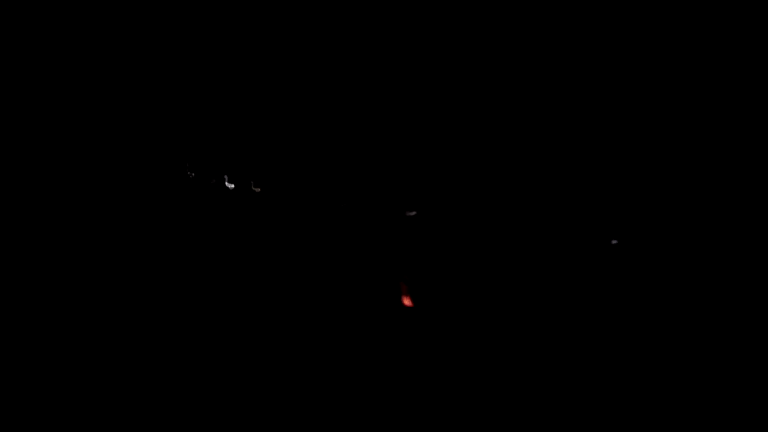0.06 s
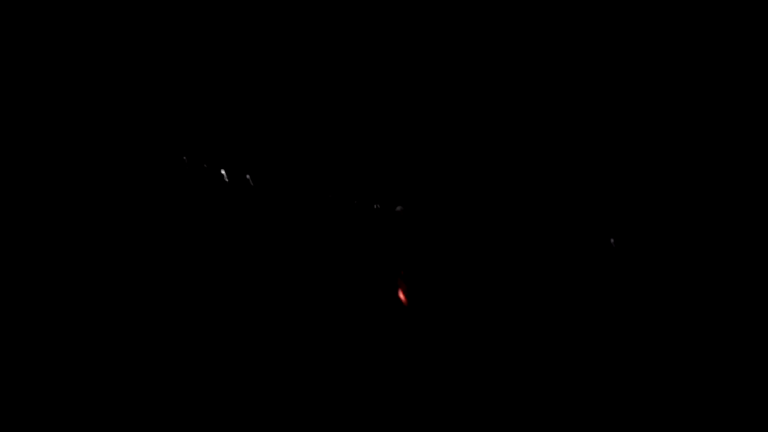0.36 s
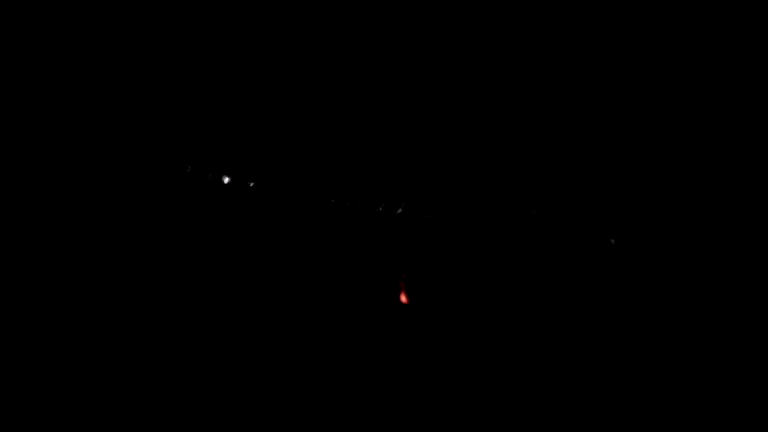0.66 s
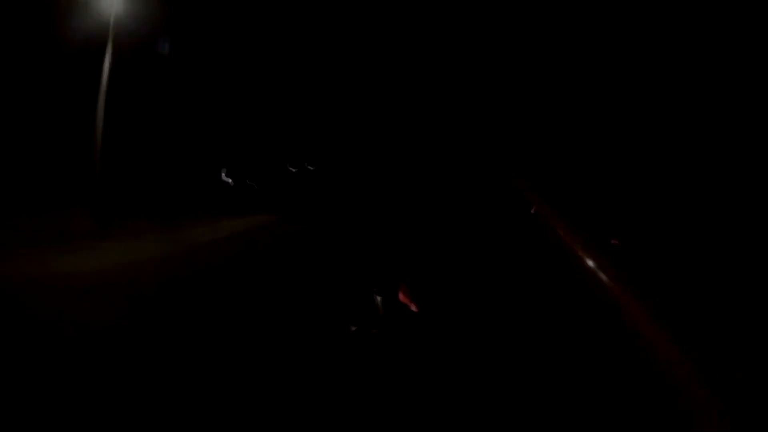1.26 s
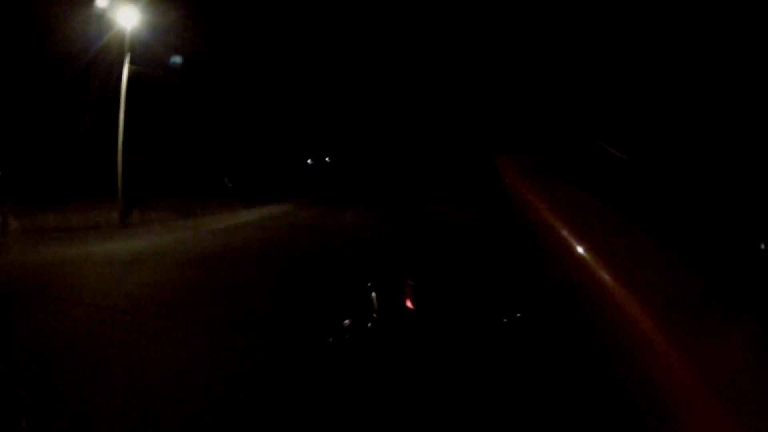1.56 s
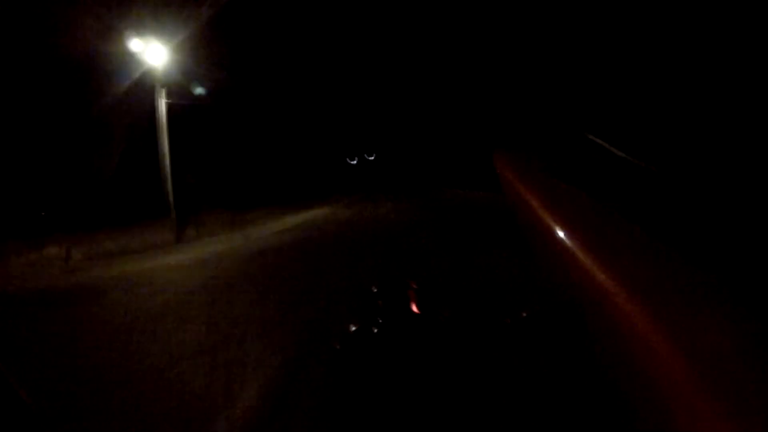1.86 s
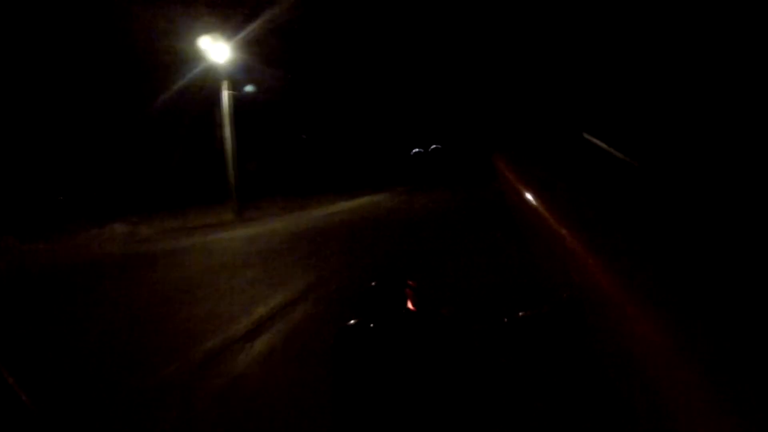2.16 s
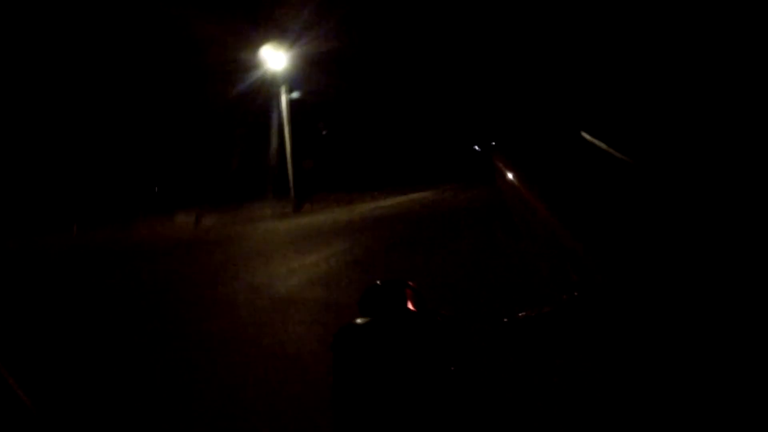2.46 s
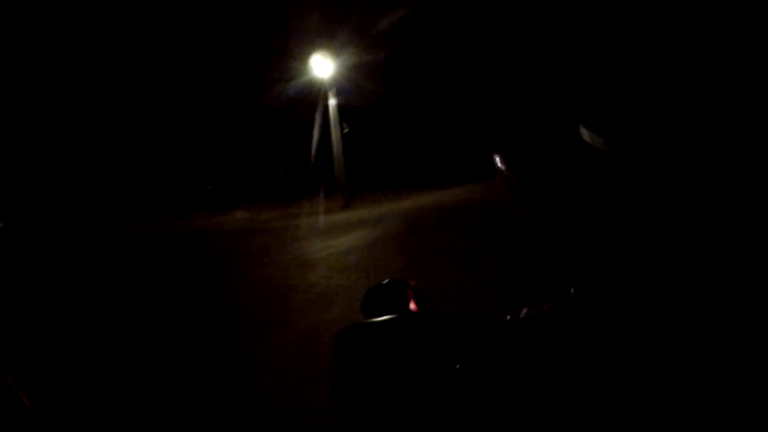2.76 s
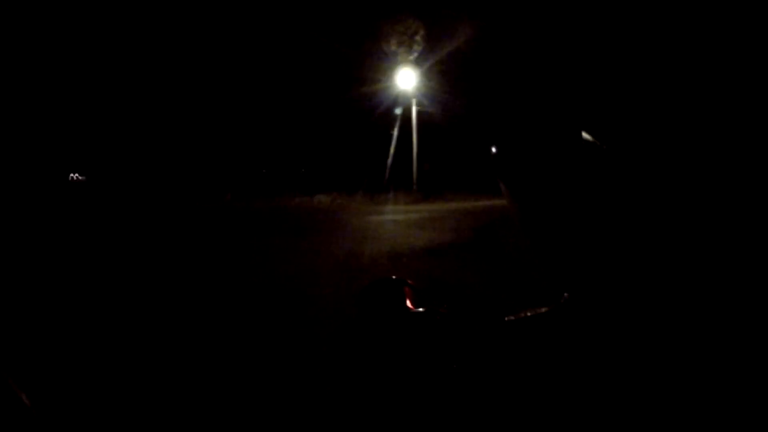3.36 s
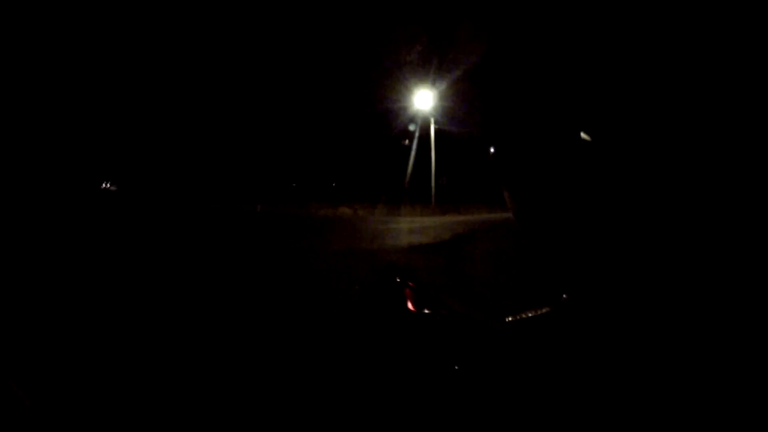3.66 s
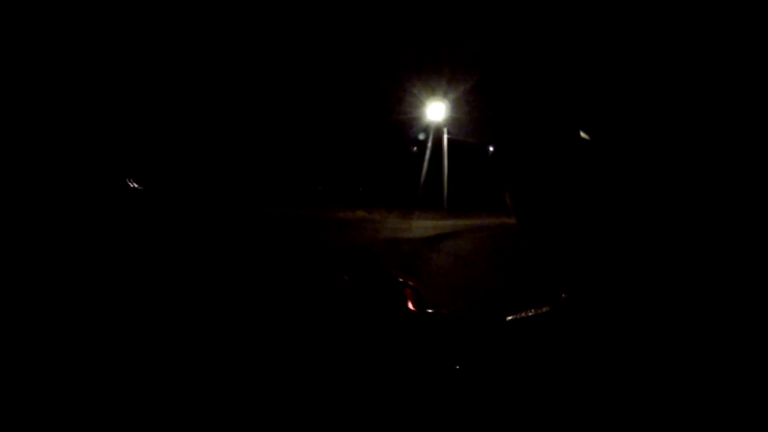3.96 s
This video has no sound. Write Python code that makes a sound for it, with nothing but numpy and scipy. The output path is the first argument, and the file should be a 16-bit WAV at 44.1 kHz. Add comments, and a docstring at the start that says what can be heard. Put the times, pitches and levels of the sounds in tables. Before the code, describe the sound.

Strong wind batters the microphone on a moving motorcycle, crackling and hooting. It drops away to bare the thudding engine, which gathers speed until a duller wind returns. Heard from the saddle, almost entirely on the left.

```python
"""Night ride on a motorcycle

Heard from the saddle, on a camera microphone that works on the left only. A strong gust batters the
microphone and hoots across an edge; it drops away and bares the thudding engine, which gathers speed
until a duller wind returns. A limiter ducks after the hardest buffets."""
import sys
import numpy as np
from scipy import signal
from scipy.fft import rfft, irfft
from scipy.io import wavfile
from scipy.ndimage import uniform_filter1d

SR = 44100
rng = np.random.default_rng(int(sys.argv[2]) if len(sys.argv) > 2 else 0)


def unload_wav(signal):
    """Save mono or channel-first audio to the path in sys.argv[1] as 16-bit WAV at rate SR, clipped to [-1, 1]."""
    wavfile.write(
        sys.argv[1],
        SR,
        np.round(np.clip(np.atleast_2d(signal).T, -1, 1) * 32767).astype(np.int16),
    )


N = 176400
T = np.arange(N) / SR

# head wind on the microphone: t/s, level/dB
GUST_LEVEL = [(0.0, -23.5), (0.334, -23), (0.354, -28), (0.4, -26.5), (0.416, -28.5), (0.54, -18.5),
              (0.546, -20), (0.638, -22.5), (0.644, -28), (0.73, -21.5), (1.144, -24), (1.276, -22),
              (1.302, -28.5), (1.462, -25), (1.468, -26), (1.524, -26.5), (1.792, -34.5), (1.85, -55)]
# its spectrum: f/Hz, level/dB
GUST_SPECTRUM = [(15, -23), (35, 0.5), (70, 2), (140, 0.5), (300, -1), (550, -4.5), (1000, -9),
                 (2000, -17.5), (3000, -29.5), (5000, -41), (8000, -47), (15000, -55.5)]
GUST_DB, GUST_STOP_S = 5.5, 0.021
# sharp crackles of wind: t/s, level/dB
CRACKLE_HITS = [(0.12, -20), (.189, -12), (.213, -21), (0.338, -20), (0.444, -25), (0.637, -18),
                (.752, -19), (0.827, -16), (0.87, -14.5), (.999, -23), (1.062, -14), (1.181, -17),
                (1.552, -21)]
# their spectrum: f/Hz, level/dB
CRACKLE_SPECTRUM = [(100, -24), (800, 13.5), (2000, 9.5), (3200, -1.5), (5000, -20), (15000, -33)]
# wind hooting across an edge: t/s, f/Hz, level/dB
EDGE_TONE = [(0, 447.7, -30.5), (.3, 452.2, -21.5), (.4, 452.7, -30), (.53, 453.3, -17), (.65, 453.2, -26),
             (.76, 457, -20), (1.05, 457.3, -24), (1.35, 457.4, -25.5), (1.62, 461, -29), (1.85, 462, -46)]
# its partials: multiple of the pitch, level/dB
EDGE_PARTIALS = [(.5, 0), (1, 4.5), (2, -12.5)]
# duller wind as the speed builds: t/s, level/dB
BREEZE_LEVEL = [(2.7, -41), (3.0, -31), (3.14, -27.5), (3.19, -21.5), (3.3, -23.5), (3.39, -25), (3.5, -21),
                (3.62, -20), (3.7, -20.5), (3.83, -20.5), (4, -20.5)]
# its spectrum: f/Hz, level/dB
BREEZE_SPECTRUM = [(15, -8), (35, -0.5), (80, 1), (200, 0), (400, -3), (700, -14), (1100, -22.5),
                   (2000, -39), (4000, -37.5), (15000, -62.5)]
# hard buffets on the diaphragm: t/s, level/dB, width/s
BUFFET_HITS = [(0.539, -1, 0.0003), (.585, -2.5, .0014), (3.728, -8, 0.0015), (3.887, 6, 0.00084)]
# eddies hitting the microphone port: t/s, half length/s, level/dB
PORT_EDDIES = [(0.527, 0.0084, -14), (3.056, 0.003, -22), (3.217, 0.042, -29), (3.39, 0.0042, -34),
               (3.804, 0.047, -26.5)]
# snaps of fluttering air: t/s, level/dB
SNAP_HITS = [(.342, -33), (1.0, -35), (1.065, -34), (3.885, -29)]

# engine speed: t/s, firing rate/Hz
FIRING_RATE = [(0, 41), (1.5, 43), (1.87, 46.9), (2.27, 51.4), (2.55, 52.7), (3.1, 59.4), (3.5, 65.3),
               (4, 70)]
# exhaust at the saddle: t/s, level/dB
EXHAUST_LEVEL = [(0, -25), (1.3, -34.5), (1.8, -28.5), (2.1, -26), (2.7, -24.5), (3.3, -21), (4, -22)]
# exhaust pipe modes: f/Hz, t60/s, level/dB
PIPE_MODES = [(104.3, 0.1, -21), (241.6, 0.1, -13.5)]
PUFF_S, PUFF_DB_PER_OCTAVE, PIPE_DELAY_S, PIPE_LOPE = 0.0005, -4, 0.00359, .33
ECHO_S, ECHO_DB, MUFFLER_HZ = 0.0028, -14, 426
INTAKE_HZ, INTAKE_T60_S, INTAKE_DB = 150, .045, -11
# clatter of valves and chain: f/Hz, level/dB
CLATTER_SPECTRUM = [(100, 6.5), (500, -1.5), (750, 1), (1750, -1.5), (2600, -6.5), (3500, -10),
                    (4350, -13.5), (5600, -20), (8000, -26), (15000, -32.5)]
CLATTER_DB, CLATTER_DB_PER_OCTAVE = -40, 3.5
# gear rasp: f/Hz, level/dB
GEAR_SPECTRUM = [(900, -30), (1650, -1), (2000, -0.5), (2300, -2), (2600, -5), (3400, -16.5), (4550, -10),
                 (5300, -20), (6500, -20.5), (15000, -55)]
GEARS_DB, GEARS_DB_PER_OCTAVE = -52, 26.5
# squeals of the drive: t/s, half length/s, f/Hz, level/dB
DRIVE_SQUEALS = [(2.33, .25, 4200, -60), (3.98, .035, 2020, -41)]

# resonances of the camera housing: f/Hz, width/Hz, level/dB
HOUSING_MODES = [(1428, 26, -10.5), (1852, 25, -3.5), (2310, 21, -14), (4220, 47, -2), (4610, 160, -2.5),
                 (5280, 290, -1)]
# wind leaking into the dead right side: f/Hz, level/dB
LEAK_SPECTRUM = [(30, -59), (500, -48.5), (1200, -43), (2500, -26.5), (5000, -4.5), (9000, -1), (15000, -2)]
# hiss on that side: f/Hz, level/dB
HISS_SPECTRUM = [(30, 4), (300, 9.5), (1000, 1.5), (15000, 0)]


def gust():
    """Head wind straight on the microphone, with sharp crackles."""
    crackles = colour(bursts(CRACKLE_HITS, decay_s=0.0041), CRACKLE_SPECTRUM)
    return amp(GUST_DB + curve(GUST_LEVEL)) * gust_end() * turbulence(GUST_SPECTRUM) + crackles


def gust_end():
    """Gain that shuts off the head wind quickly once it has dropped."""
    return np.exp(-np.maximum(T - GUST_LEVEL[-1][0], 0) / GUST_STOP_S)


def turbulence(spectrum, eddy_hz=30, flutter_hz=250):
    """Air tearing at the microphone: eddies swell it, and all above the bass flutters."""
    air = rng.standard_normal(N)
    body = signal.sosfiltfilt(butter(2, 1200), air)
    bass = signal.sosfiltfilt(butter(2, 220), air)
    eddies, flutter = wander(eddy_hz), amp(2.5 * wander(flutter_hz))
    rumble = bass * evened(amp(1.5 * wander(eddy_hz)))
    roar = (body - bass) * evened(flutter * amp(2 * eddies))
    rasp = (air - body) * evened(flutter * amp(1.26 * eddies))
    return evened(colour(rumble + roar + rasp, spectrum))


def hoot():
    """The head wind blows across an edge and sounds a wavering tone."""
    pitch = curve(EDGE_TONE) * (1 + 0.011 * wander(52))
    phase = 2 * np.pi * np.cumsum(pitch) / SR
    tone = sum(amp(db - 2 * wander(30)) * np.sin(multiple * phase) for multiple, db in EDGE_PARTIALS)
    return amp(curve(EDGE_TONE, column=2)) * gust_end() * evened(tone)


def breeze():
    """Duller wind on the microphone as the motorcycle speeds up."""
    return amp(curve(BREEZE_LEVEL)) * turbulence(BREEZE_SPECTRUM)


def buffets():
    """Single slaps of air on the diaphragm: a suck and its rebound."""
    out = np.zeros(N)
    for s, db, width in BUFFET_HITS:
        rebound = 0.29 * swell(s + 2.5 * width, 3.8 * width)
        out += amp(db) * (rebound - swell(s, width))
    return out


def whooshes():
    """Eddies hit the microphone port squarely and sound its hollow resonance."""
    hollow = evened(signal.sosfilt(butter(2, [328, 610], "band"), rng.standard_normal(N)))
    return sum(amp(db) * swell(s, width) for s, width, db in PORT_EDDIES) * hollow


def snaps():
    """Fluttering air makes very short, bright ticks."""
    return signal.sosfilt(butter(2, 4500, "high"), bursts(SNAP_HITS, decay_s=.0028))


def engine():
    """Just below the saddle: the exhaust thuds; clatter and gears pulse with it and grow with speed."""
    rate = curve(FIRING_RATE)
    octaves = np.log2(rate / rate.mean())
    turns = .03 + np.cumsum(rate * (1 + .003 * wander(30))) / SR  # one firing a turn, slightly uneven
    thuds = amp(curve(EXHAUST_LEVEL)) * exhaust(turns, octaves)
    clatter = amp(CLATTER_DB + CLATTER_DB_PER_OCTAVE * octaves) * noise(CLATTER_SPECTRUM)
    gears = amp(GEARS_DB + GEARS_DB_PER_OCTAVE * octaves) * gear_train(turns)
    pulsing = 1 + 0.13 * np.cos(2 * np.pi * turns)
    flicker = amp(1.1 * wander(150))
    return thuds + pulsing * flicker * (clatter + gears)


def exhaust(turns, octaves):
    """Each firing puffs and rings the pipe; the intake gulps on every second one. All is muffled."""
    count = np.floor(turns)
    fires = np.diff(count, prepend=count[0])
    t = T[:SR // 4]
    onset = 1 - np.exp(-t / PUFF_S)
    puff = (t / PUFF_S) ** 4 * np.exp(-t / PUFF_S)
    strength = amp(PUFF_DB_PER_OCTAVE * octaves + .4 * rng.standard_normal(N))
    puffs = -signal.oaconvolve(fires * strength, puff / puff.max())[:N]
    echo = amp(ECHO_DB) * np.interp(T - ECHO_S, T, puffs)  # from the end of the pipe
    ring = onset * sum(amp(db - 60 * t / t60) * np.sin(2 * np.pi * hz * t) for hz, t60, db in PIPE_MODES)
    lope = 1 - PIPE_LOPE * np.cos(np.pi * turns)  # strong and weak in turn
    kicks = fires * (lope + .1 * rng.standard_normal(N))
    pipe = signal.oaconvolve(np.interp(T - PIPE_DELAY_S, T, kicks), ring)[:N]
    gulp = onset * amp(INTAKE_DB - 60 * t / INTAKE_T60_S) * np.sin(2 * np.pi * INTAKE_HZ * t)
    intake = signal.oaconvolve(fires * (count % 2), gulp)[:N]
    pressure = evened(signal.sosfilt(butter(1, 2.9, "high"), puffs + echo + pipe + intake))
    return signal.sosfiltfilt(butter(4, MUFFLER_HZ), pressure)


def gear_train(turns, slack_turns=.002):
    """Teeth meet in the same uneven pattern on every turn, blurred by their slack."""
    teeth = rng.standard_normal(400)
    places = np.arange(len(teeth)) / len(teeth)
    pattern = np.interp(turns + slack_turns * wander(260), places, teeth, period=1)
    return evened(colour(pattern, GEAR_SPECTRUM))


def squeals(width_hz=52):
    """Thin, fuzzy metallic squeals from the drive swell and fade."""
    out = np.zeros(N)
    for s, half_length, hz, db in DRIVE_SQUEALS:
        phase = 2 * np.pi * hz * T
        fuzzy_tone = wander(width_hz) * np.cos(phase) + wander(width_hz) * np.sin(phase)
        out += amp(db) * swell(s, half_length) * fuzzy_tone
    return out


def housing(x):
    """The camera's shell rings a little around the microphone."""
    return x + sum(amp(db) * signal.lfilter(*signal.iirpeak(hz, hz / width, fs=SR), x)
                   for hz, width, db in HOUSING_MODES)


def dead_side(motor):
    """The right channel carries only hiss and a faint leak of head wind and engine."""
    thin_wind = colour(turbulence(GUST_SPECTRUM), LEAK_SPECTRUM)
    wind_leak = amp(1 + GUST_DB + curve(GUST_LEVEL)) * gust_end() * thin_wind
    return wind_leak + amp(-56) * motor + amp(-65) * noise(HISS_SPECTRUM)


def amp(db):
    """Decibels to gain."""
    return 10 ** (np.asarray(db) / 20)


def evened(x):
    """Scales to an rms of one."""
    return x / np.sqrt(np.mean(x ** 2) + 1e-20)


def curve(rows, column=1):
    """One column of a table over time."""
    rows = np.array(rows)
    return np.interp(T, rows[:, 0], rows[:, column])


def butter(order, hz, kind="low"):
    """Sections of a filter with a flat passband."""
    return signal.butter(order, hz, kind, fs=SR, output="sos")


def colour(x, spectrum, size=8192):
    """Minimum-phase filter shaped by rows of f/Hz, level/dB."""
    hz, db = np.transpose(spectrum)
    bins_hz = abs(np.fft.fftfreq(size, 1 / SR))
    log_gain = np.log(amp(np.interp(np.log(bins_hz + 1), np.log(hz), db)))
    taps = np.fft.ifft(np.exp(np.conj(signal.hilbert(log_gain)))).real[:size // 2]
    return signal.oaconvolve(x, taps)[:N]


def noise(spectrum):
    """Coloured noise of unit rms."""
    return evened(colour(rng.standard_normal(N), spectrum))


def wander(hz):
    """Smooth random motion of unit rms, up to about the given rate."""
    f = np.fft.rfftfreq(N, 1 / SR)
    band = np.exp(-(f / hz) ** 2) * np.minimum(f / hz * 10, 1)
    return evened(irfft(rfft(rng.standard_normal(N)) * band, N))


def swell(s, width):
    """A bell-shaped rise and fall around a moment."""
    return np.exp(-((T - s) / width) ** 2)


def bursts(hits, decay_s):
    """Bursts of noise that start at once and die quickly."""
    envelope = sum(amp(db) * (T >= s) * np.exp(-abs(T - s) / decay_s) for s, db in hits)
    return envelope * rng.standard_normal(N)


def scene():
    """From the saddle: wind and engine reach the left side through the housing; the right is near dead."""
    motor = engine() + squeals()
    wind = gust() + hoot() + breeze() + whooshes() + buffets() + snaps()
    return np.array([housing(wind + motor), dead_side(motor)])


def record(dry, limit_db=-4.5, recover_db_per_s=85, top_hz=14950):
    """The camera's limiter catches peaks on each side and lets go slowly; soft ends, band limit."""
    over_db = np.maximum(20 * np.log10(abs(dry) + 1e-9) - limit_db, 0)
    recovery_db = T * recover_db_per_s
    held_db = np.maximum.accumulate(over_db + recovery_db, axis=1) - recovery_db
    limited = dry / amp(uniform_filter1d(held_db, size=24, axis=1))
    faded = limited * np.clip(np.minimum(T, T[-1] - T) / .003, 0, 1)
    lowpass = signal.firwin(511, top_hz, window=("kaiser", 9), fs=SR)
    return signal.oaconvolve(faded, lowpass[None], "same")


dry = scene()
out = record(dry)
unload_wav(out)
```